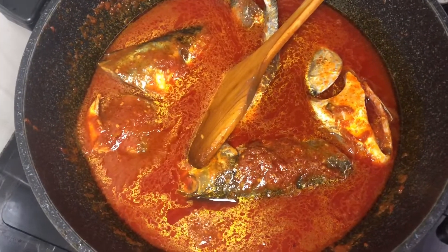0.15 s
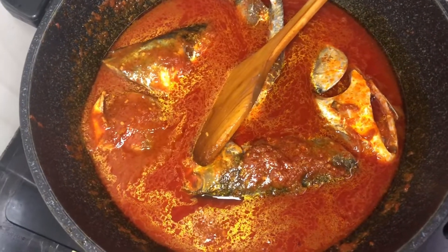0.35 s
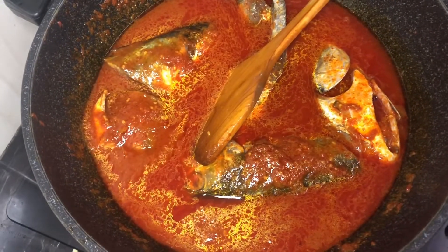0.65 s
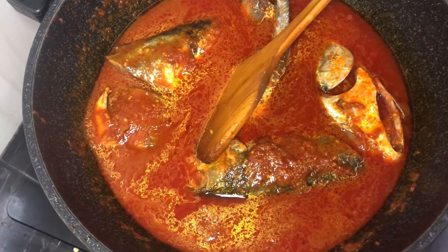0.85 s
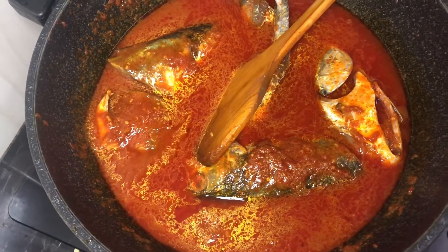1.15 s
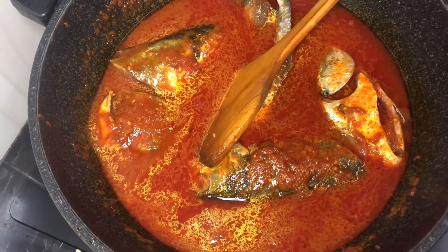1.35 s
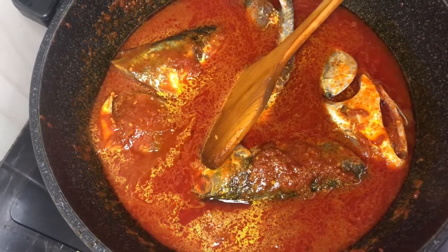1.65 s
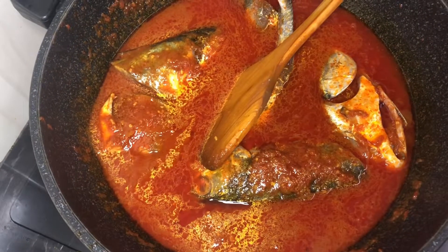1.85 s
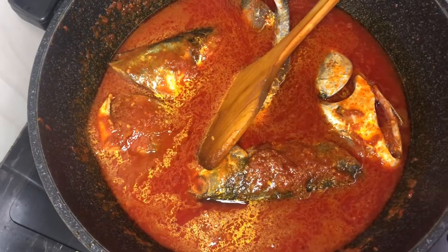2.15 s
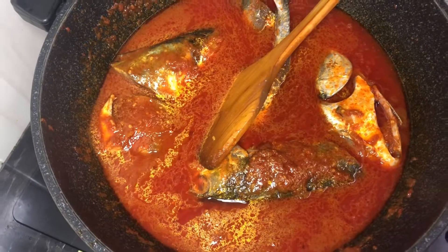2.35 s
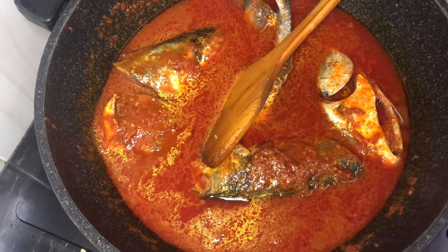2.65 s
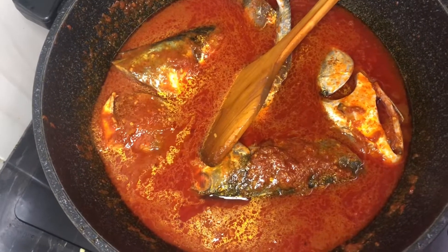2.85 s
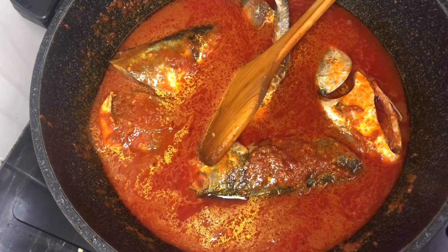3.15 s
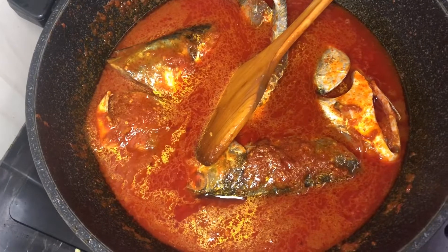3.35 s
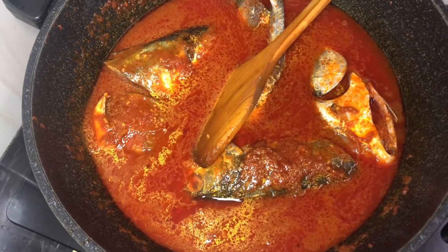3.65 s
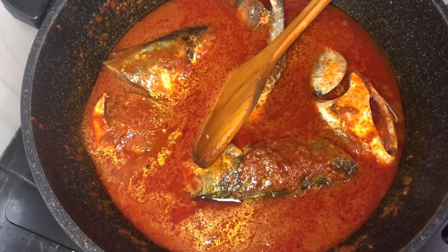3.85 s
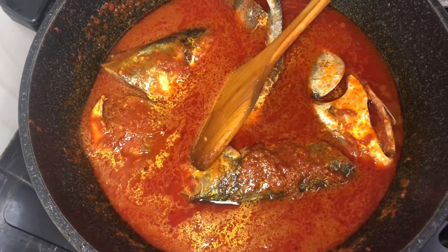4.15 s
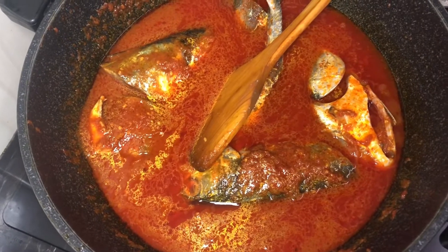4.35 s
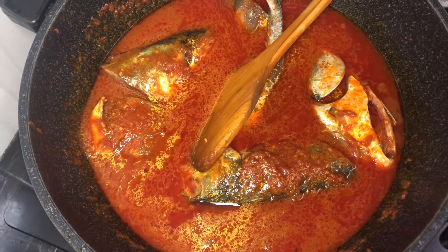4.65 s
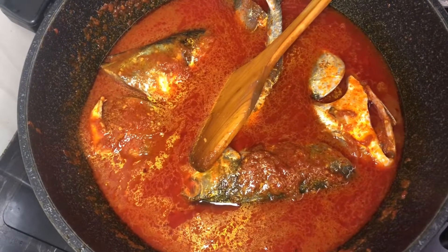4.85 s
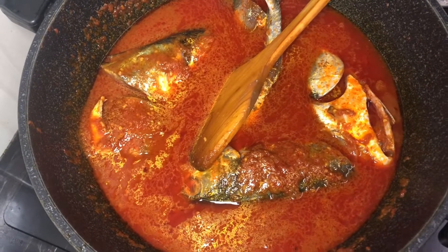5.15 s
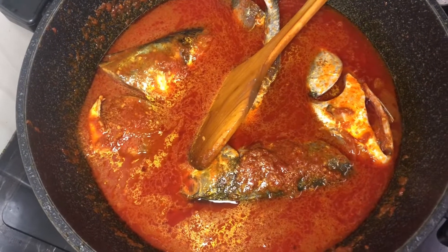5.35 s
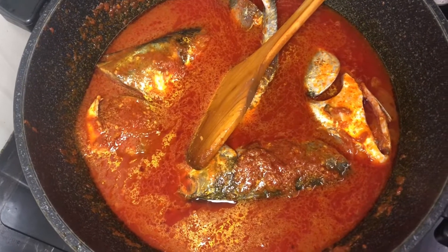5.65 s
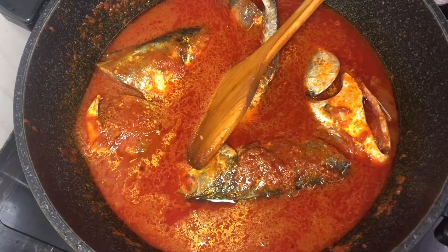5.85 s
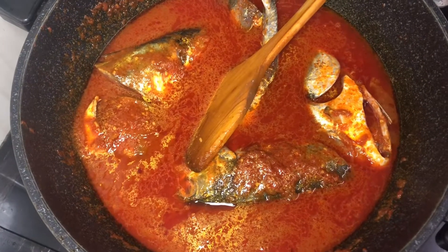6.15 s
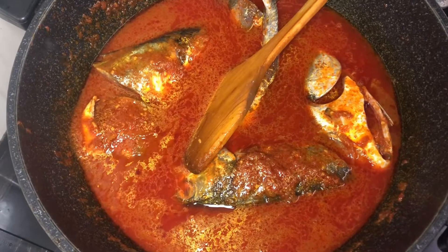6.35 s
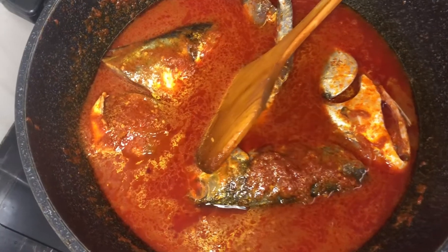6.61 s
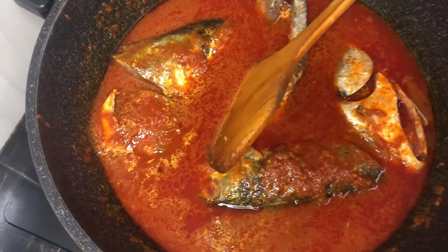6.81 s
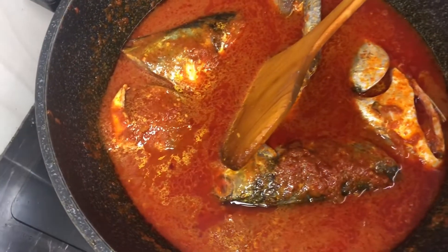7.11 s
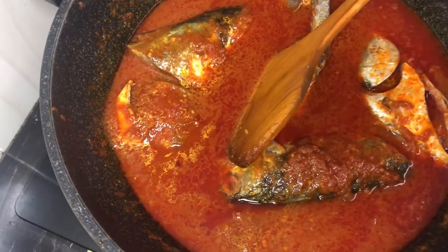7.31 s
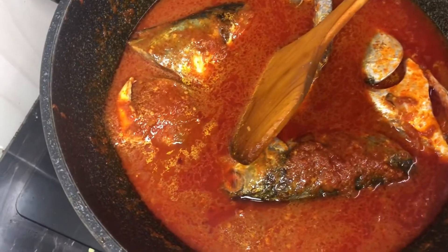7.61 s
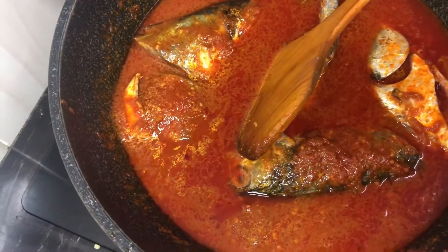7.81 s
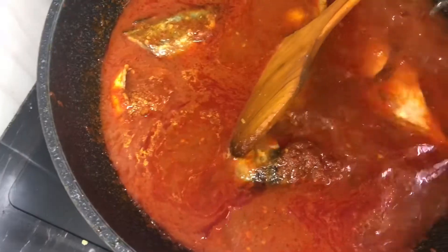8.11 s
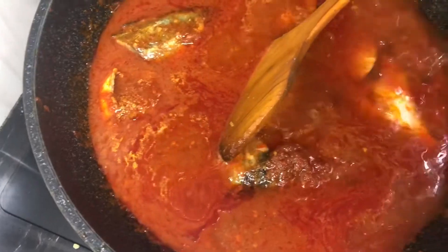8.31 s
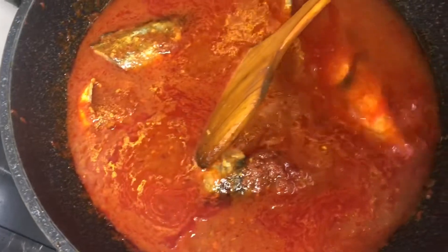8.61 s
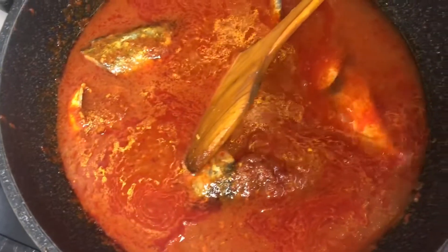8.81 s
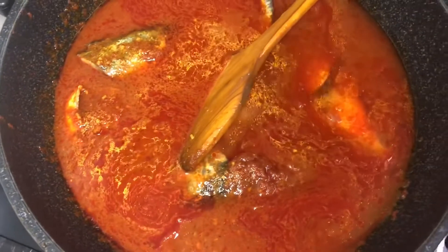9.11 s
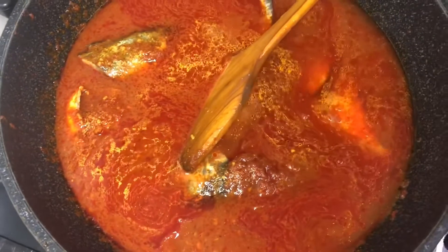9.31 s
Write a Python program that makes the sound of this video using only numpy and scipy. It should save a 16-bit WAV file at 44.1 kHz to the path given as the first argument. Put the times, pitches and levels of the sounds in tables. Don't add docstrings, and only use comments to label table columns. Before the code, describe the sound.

In a small kitchen with a low appliance hum, a tap opens onto steel, a metal lid clatters, a basin rattles and a jug is knocked and scraped. The splashing, fizzing jet makes the jug sing until it stops. Drops and taps follow, then a loud knock, a dip to silence, a gentle pour into sauce and a spatula knock. Close microphone, short echo.

```python
import sys
import numpy as np
from scipy import signal
from scipy.fft import rfft, irfft
from scipy.io import wavfile
from scipy.ndimage import uniform_filter1d, map_coordinates

SR = 44100
rng = np.random.default_rng(int(sys.argv[2]) if len(sys.argv) > 2 else 0)


def unload_audio(sound):
    columns = np.transpose(np.atleast_2d(sound))
    steps = np.round(np.clip(columns, -1, 1) * 32767)
    wavfile.write(sys.argv[1], SR, steps.astype(np.int16))


def linear_from_db(decibels):
    return 10 ** (np.asarray(decibels, float) / 20)


N = 417627

# frequency in Hz, density in dB per Hz.
ROOM_TONE = [(22, -54), (40, -26), (60, -30), (80, -5.5), (110, -3), (160, -7.5), (200, -8), (320, -17),
             (700, -17), (1800, -22.5), (4000, -30.5), (8000, -38), (11000, -40), (16000, -35)]
# time in seconds, gain in dB.
SIMMER = [(0, -1), (5.5, 1.5)]
# frequency in Hz, width in Hz, level in dB.
CABINET = [(195.2, 7.9, -56.5), (472.4, 5.5, -65.5), (714.4, 60, -59.5)]
# frequency in Hz, width in Hz.
MOTOR_HZ = [(100.1, .1), (93.5, .8), (120.3, .8), (232, .8)]
MOTOR_DB = [-41.5, -48.5, -48.5, -58.5]
# time in seconds, gain in dB.
JOLT = [
    (0.95, -1),
    (1.34, 15),
    (1.87, 13),
    (2.08, -0.5),
]

# time in seconds, level in dB.
TAP_ON_STEEL = [
    (0.49, -72),
    (0.515, -55),
    (0.688, -55),
    (0.888, -47.5),
]
# time in seconds, level in dB.
TAP_IN_JUG = [(1.17, -53), (1.95, -52.5), (2.4, -49), (2.9, -50), (3.3, -52.5), (3.69, -48.5), (3.88, -51),
              (4.19, -50), (4.65, -51.5), (5.19, -50.5), (5.82, -50.5), (5.87, -56.5), (6.0, -72)]
# time in seconds, level in dB.
SPURT = [
    (5.9, -64),
    (7.04, -70),
    (7.095, -51),
    (7.17, -51),
    (7.26, -59),
    (7.42, -61),
    (7.65, -60),
    (7.79, -54.5),
    (8.03, -61.5),
]
# time in seconds, level in dB.
POUR = [
    (8.045, -60),
    (8.16, -61.5),
    (8.35, -59),
    (8.95, -56),
    (9.284, -60.5),
    (9.47, -61.5),
]
# level in dB at full force, dB gained per dB of force.
ON_STEEL = [(-7, 0.7), (0.7, 1.2), (3, 0.8)]
# level in dB at full force, dB gained per dB of force.
IN_JUG = [(0.57, 0.76), (0.8, 1.33), (-1.9, 1.16)]
# level in dB at full force, dB gained per dB of force.
IN_BASIN = [(-6, 0.76), (0, 0.97), (0, 2.1)]
# level in dB at full force, dB gained per dB of force.
IN_SAUCE = [(9, 1.64), (-2.5, 0.56), (-9, 0.44)]
# frequency in Hz, width in Hz, level in dB.
FILLING = [(1150, 43, -9), (1400, 24, -4), (1786, 60, -6.5), (2160, 43, -4.5), (2530, 36, -9),
           (2883, 49, -6), (3300, 90, -8), (4760, 47, -13), (6850, 76, -19)]
# time in seconds, level in dB.
SINGING = [
    (2.6, -15),
    (2.85, 15),
    (3.9, -2),
    (4.5, 4),
    (5.6, 5),
    (5.9, -18),
]

# time in seconds, peak in dB, centre in Hz.
DRIPS = [(0.7094, -33, 14800), (0.764, -33, 6730), (0.8594, -31, 11000), (0.9438, -30, 14300),
         (6.774, -41.5, 4930), (7.2644, -30.5, 7000), (7.2978, -32, 6700), (7.434, -39, 13300),
         (7.4722, -26, 8060), (7.5368, -32, 13900), (7.5544, -30, 11900), (7.5867, -29, 15600),
         (7.6074, -25, 6300), (7.7193, -38, 5300), (7.7445, -27, 12700), (7.7887, -33, 11900),
         (7.8521, -38, 5380), (6.178, -45.5, 9000), (6.368, -49, 8000), (6.472, -46, 13000)]
# time in seconds, peak in dB, centre in Hz.
PLOPS = [(.712, -35, 990), (1.075, -34, 1174), (3.323, -34.5, 1060), (7.428, -38, 1050), (7.436, -42, 3700),
         (7.472, -34, 2000), (7.479, -35, 2900), (7.484, -36, 4000), (7.556, -32, 2050),
         (7.592, -36.5, 1900), (7.618, -38, 3500), (7.627, -39, 2700), (7.678, -37.5, 1120),
         (7.7186, -27.5, 3650), (7.729, -33, 3800), (7.747, -39, 2000), (7.7745, -38, 1170),
         (7.841, -34, 2100), (7.846, -35, 1700), (7.852, -39, 3600)]
# time in seconds, peak in dB, centre in Hz.
FLARES = [(3.1293, -33, 1750), (3.2425, -35, 2300), (3.3388, -37, 2160), (3.4251, -36, 2820),
          (3.5927, -33, 3480), (3.7538, -33, 1750), (4.2238, -36, 3160), (4.4074, -35.5, 1730),
          (4.5421, -34, 1790), (4.6314, -34, 1780), (4.8224, -32, 2810), (4.9448, -31, 2930),
          (5.0329, -36, 2260), (5.1681, -33, 2090), (5.2544, -33.5, 3340), (5.3871, -35.5, 3860),
          (5.5094, -36, 1740), (5.8062, -36, 1820)]
# time in seconds, peak in dB, centre in Hz.
SPATTER = [(8.107, -37, 15200), (8.1314, -33, 9620), (8.1489, -38, 15200), (8.1884, -39, 14000),
           (8.184, -41, 9300), (8.195, -33, 15300), (8.1185, -33, 13200), (8.109, -37, 10000),
           (8.2252, -33, 15400), (8.2427, -42, 13800), (8.2566, -34, 9140), (8.2741, -41, 11600),
           (8.3086, -32, 11900), (8.328, -43, 9270), (8.336, -29, 13000), (8.3606, -34, 13200),
           (8.3794, -47, 5480), (8.4494, -47, 5050), (8.569, -42, 9790), (8.8852, -39, 14900),
           (8.9006, -44, 7570), (9.3462, -45, 6150)]

# frequency in Hz, width in Hz, level in dB.
LID = [(715, 97, 6.5), (842, 40, 8), (1020, 21, -13), (1100, 5.7, 5), (1515, 37, 8), (1815, 42, 9),
       (2090, 40, 2), (2310, 46, 4), (2920, 170, 6.5), (3350, 30, -16), (3830, 30, -33)]
# frequency in Hz, width in Hz, level in dB.
BASIN = [(616, 22, -6), (713, 24, 5), (790, 71, 0), (935, 57, -6.5), (918, 50, 5.5), (1130, 14, 5),
         (1285, 18, -4), (1490, 66, -1.5), (2100, 49, 1.5), (2320, 54, 0), (2550, 80, 2), (2970, 55, -2),
         (3290, 50, -13), (3570, 27, -5), (4670, 60, -5), (6210, 46, 5), (6700, 60, -20)]
# frequency in Hz, width in Hz, level in dB.
JUG = [(1780, 20, -14), (2095, 46, -6), (2810, 60, -2.5), (3275, 26, 4), (3940, 40, -5), (4860, 27, 0.5),
       (5870, 40, -6), (7000, 40, -0.5), (6700, 36, -2), (9860, 50, -4)]
# frequency in Hz, width in Hz, level in dB.
RIM = [(71, 8.5, -17), (165, 11, -9), (287, 31, -4.5), (408, 36, 3), (490, 69, -8), (740, 64, 3),
       (1330, 87, 4), (2100, 210, 2), (2380, 160, -6), (3700, 250, -19)]
# time in seconds, peak in dB, hardness (edge over body) in dB, rattle t60 in seconds.
LID_HITS = [
    (1.186, -16.5, 4, 0.28),
    (1.208, -24, 2, .15),
    (1.244, -21.5, 8, 0.23),
    (1.291, -22.5, -4, 0.22),
    (1.333, -26.5, -9, 0.22),
    (1.379, -29.5, -13, .2),
    (1.415, -31.5, -9, 0.17),
    (1.443, -26, 5, 0.15),
]
# time in seconds, peak in dB, hardness in dB, rattle t60 in seconds.
BASIN_HITS = [(1.514, -28, 4, 0.12), (1.533, -22.5, 1, 0.2), (1.545, -21, -14, .22),
              (1.574, -25.5, 4, 0.13), (1.6, -27, -10, 0.33), (1.622, -27, -14, .15),
              (1.633, -18.5, 6, 0.15), (1.668, -24, -1, 0.17), (1.718, -23, 14, 0.14),
              (1.735, -19, -8.5, 0.21), (1.762, -24.5, -13, 0.28)]
# time in seconds, peak in dB, hardness in dB, rattle t60 in seconds.
WET_BASIN_HITS = [
    (1.797, -27, 4, 0.17),
    (1.85, -38, 20, .5),
    (2.463, -29, 6, 0.35),
    (2.514, -30, 6, 0.35),
    (2.685, -27, 12, 0.25),
    (2.739, -30, 16, 0.49),
    (3.324, -35, -7, 0.18),
]
# time in seconds, peak in dB, hardness in dB, rattle t60 in seconds.
JUG_HITS = [
    (2.012, -17.5, 3.8, 0.15),
    (2.686, -26.5, 1.5, 0.6),
    (2.933, -24.5, 3, 0.32),
    (2.969, -30.5, 26, 0.22),
]
# time in seconds, peak in dB, hardness in dB, rattle t60 in seconds.
RIM_HITS = [
    (7.472, -32, 8, 0.24),
    (7.526, -31, 3, 0.06),
    (7.538, -31, 2, 0.12),
    (7.555, -30, 8, 0.14),
    (7.59, -34, 8, 0.12),
    (7.816, -18, 9, 0.035),
    (7.842, -39, 8, 0.06),
    (9.228, -18.5, 24, 0.082),
    (9.288, -29, 26, 0.086),
]
# frequency in Hz, width in Hz, level in dB.
COUNTER = [(119.6, 14.4, -3), (155.3, 9, -9), (194.2, 9.8, -1.5), (228.7, 11.7, 0), (283, 16, -5.5),
           (380, 30, -10.5), (458, 9, -7)]
# time in seconds, peak in dB.
COUNTER_THUDS = [
    (1.245, -12.5),
    (1.29, -23),
    (1.325, -19),
    (1.385, -21),
    (1.52, -28.5),
    (1.6, -28.5),
    (1.75, -32),
    (2.1, -40),
    (5.66, -39),
]
# time in seconds, peak in dB.
PAN_THUDS = [
    (9.233, -19),
    (9.291, -25.5),
]

# time in seconds, peak in dB, frequency in Hz, t60 in seconds.
PINGS = [(1.8274, -34, 3290, 0.085), (1.94, -37, 2700, 0.17), (2.0115, -19.5, 4680, 0.074),
         (3.5794, -43, 3440, 0.15), (4.5494, -43, 2190, 0.14), (4.9452, -41, 2910, 0.098),
         (1.188, -26, 1500, .13), (1.19, -26.5, 861, .25), (1.188, -27, 2400, .09), (1.188, -27, 2850, .07),
         (1.445, -31, 2200, 0.084), (1.292, -29, 804, .1), (2.463, -28.5, 1130, .11),
         (2.463, -32, 2100, 0.077), (2.463, -35.5, 2900, .1), (2.514, -32, 2500, .09),
         (2.686, -29.5, 2540, .15), (2.686, -35, 1900, 0.092), (2.686, -33, 1490, .1),
         (2.932, -31, 2780, .08), (2.932, -31, 3250, .1), (1.797, -28, 628, .12), (7.817, -25, 2730, .05),
         (7.817, -27, 3500, 0.047)]
# time in seconds, peak in dB, frequency in Hz, t60 in seconds.
SWELLS = [(1.482, -32, 1130, .2), (1.545, -18.5, 2490, .1), (1.537, -20.5, 945, .11),
          (1.535, -27, 760, .14), (1.62, -28, 910, .25), (1.634, -27, 2570, .13), (1.662, -26, 2700, .08),
          (1.718, -25, 2320, .2), (1.729, -21, 905, .1), (1.76, -27, 1000, .1), (1.74, -29, 615, .3),
          (1.245, -30, 1830, .1), (1.31, -33, 1830, .1), (1.86, -39, 2230, .3), (2.512, -33, 670, .12),
          (2.5, -36, 2200, 0.22), (2.7, -32, 740, .16), (2.695, -37, 3280, .12), (2.745, -37, 3220, .3),
          (7.551, -27, 2850, .085), (7.53, -33, 1050, .2), (2.525, -33, 615, .35), (2.635, -33, 622, .3),
          (2.72, -32, 615, .3), (2.8, -35, 610, .2), (2.56, -38, 1150, 0.22), (2.75, -36, 1370, .15)]
# time in seconds, peak in dB, frequency in Hz, t60 in
# seconds.
BUBBLES = [
    (7.463, -24.5, 1220, 0.037),
    (7.539, -23, 1330, 0.044),
    (7.526, -28, 1090, 0.055),
    (2.935, -30, 6850, .12),
]
# time in seconds, peak in dB, frequency in Hz, t60 in seconds.
HUMS = [
    (2.934, -42, 4860, 0.31),
    (7.54, -34, 490, 0.14),
    (7.82, -28, 644, 0.06),
]
# time in seconds, level in dB.
DRAG = [
    (2.035, -30),
    (2.043, -36),
    (2.052, -15.5),
    (2.122, -18),
    (2.16, -28.5),
    (2.3, -39),
]
# frequency in Hz, width in Hz, level in dB.
SCRAPE = [(1860, 41, 0), (3316, 73, 3.5), (3800, 11, -5), (4860, 56, 1.5), (5820, 44, -2), (6730, 88, 7),
          (7800, 170, -7), (8900, 150, -6), (9750, 35, -2), (11900, 67, -15), (12900, 55, -8),
          (14000, 110, -1)]
# time in seconds, frequency in Hz, level in dB.
WHISTLE = [
    (2.84, 1790, -55),
    (2.86, 1695, -48),
    (2.93, 1784, -43.5),
    (3.36, 1778, -58),
    (3.57, 1739, -51),
    (3.84, 1758, -46),
    (3.88, 1770, -60),
    (5.47, 1786, -55),
    (5.7, 1742, -62),
]
# frequency in Hz, t60 in seconds.
ECHO = [(200, 0.88), (1000, 0.28), (4000, 0.19), (12000, 0.22)]


def evened(x):
    return x / np.sqrt(np.mean(x ** 2) + 1e-20)


def read(points, hz):
    f, value = np.transpose(points)
    return np.interp(np.log(hz + 1), np.log(f + 1), value)


def add(mix, start_s, sound):
    part = mix[round(start_s * SR):][:len(sound)]
    part += sound[:len(part)]


def resonate(x, hz, width_hz):
    turn = np.exp(2j * np.pi * np.cumsum(hz * np.ones(len(x))) / SR)
    r = np.exp(-np.pi * width_hz / SR)
    return 2 * (turn * signal.lfilter([1 - r], [1, -r], x / turn + 1e-18)).real


def colour(x, points):
    return irfft(rfft(x) * linear_from_db(read(points, np.fft.rfftfreq(len(x), 1 / SR))), len(x))


def hiss(field_db, patchy_db, flicker_db, size):
    a, b, patches = rng.standard_normal((field_db.shape[1], field_db.shape[0], 3)).T
    patches = uniform_filter1d(patches, size=3, axis=0)
    patches = evened(uniform_filter1d(patches, size=12288 // size, axis=1))
    flicker = evened(uniform_filter1d(patches[0] + a[0], size=3))
    depth_db = patchy_db * np.linspace(1, .55, len(a))[:, None]
    z = (a + 1j * b) * linear_from_db(field_db + depth_db * patches + flicker_db * flicker)
    return signal.istft(z, nperseg=size, noverlap=3 * size // 4)[1][:N]


def room_tone():
    room_db, shaft_hz, shake_db, shake_wander_db = -46, 48.5, -65, 3.5
    hz = np.fft.rfftfreq(2048, 1 / SR)
    frame_s = np.arange(N // 512 + 5) * 512 / SR
    field_db = read(ROOM_TONE, hz)[:, None] * np.ones(len(frame_s))
    finest = np.clip(hz / 5000 - 1.6, 0, 1)[:, None]
    field_db = field_db + finest * np.interp(frame_s, *np.transpose(SIMMER))
    power = linear_from_db(2 * field_db[:, 0])
    share = np.sum(power[hz > 300]) / np.sum(power)
    wash = linear_from_db(room_db) * evened(hiss(field_db, 2.62, 0.52, size=2048)) / np.sqrt(share)

    noise, t = rng.standard_normal(N), np.arange(N) / SR
    hum = sum(linear_from_db(db) * evened(resonate(resonate(noise, f, w), f, w)) for f, w, db in CABINET)
    for (f, w), db in zip(MOTOR_HZ, MOTOR_DB):
        wander = evened(uniform_filter1d(rng.standard_normal(N), size=SR // 2))
        hum += linear_from_db(db) * np.sqrt(2) * np.sin(2 * np.pi * np.cumsum(f + w / 2 * wander) / SR)

    sway = evened(uniform_filter1d(uniform_filter1d(noise, size=SR // 3), size=SR // 3))
    level_db = shake_db + shake_wander_db * sway + np.interp(t, *np.transpose(JOLT))
    return wash + hum + linear_from_db(level_db) * np.sqrt(2) * np.sin(2 * np.pi * shaft_hz * t)


def layers(force, surface):
    s, db = np.transpose(force)
    return np.transpose([s] + [db.max() + full_db + follow * (db - db.max()) for full_db, follow in surface])


def water(rows, sing_db, patchy_db, grain_db):
    s, splash, spray, fizz = np.transpose(rows)
    hz, t = np.fft.rfftfreq(512, 1 / SR), np.arange(N // 128 + 5) * 128 / SR
    density_db = [splash - 14, splash - 5, splash, spray - 2.2, fizz - 3.7, fizz - 3.7]
    levels_db = np.array([np.interp(t, s, d, -130, -130) for d in density_db])
    band_hz = [400, 1000, 2600, 6300, 12000, 16000]
    place = np.interp(np.log(hz + 1), np.log(band_hz), np.arange(6))
    field_db = map_coordinates(levels_db, np.meshgrid(place, np.arange(len(t)), indexing="ij"), order=1)
    flow = hiss(field_db, patchy_db, 0.8, size=512) * linear_from_db(-9.5)

    drops = linear_from_db(grain_db * np.minimum(rng.exponential(1, N), 4))
    drops *= rng.random(N) < 60 / SR
    flow = flow * (1 + 0.16 * signal.oaconvolve(drops, np.exp(-np.arange(800) / 160))[:N])

    swings = evened(uniform_filter1d(rng.standard_normal((len(t), len(FILLING))), size=40, axis=0)).T
    sung = np.zeros(N)
    for (f, w, db), swing in zip(FILLING, swings):
        sung += linear_from_db(db + 1.6 * np.repeat(swing, 128)[:N]) * resonate(flow, f, w)
    return flow + linear_from_db(sing_db) * sung


def tick(s, peak_db, hz, t60, breadth_oct, top_db):
    t = np.arange(4410) / SR
    near, far = 2 ** breadth_oct, 2 ** (3 * breadth_oct)
    shape = [(hz / far, -40), (hz / near, -12), (hz, 0), (hz * near, -12), (hz * far, top_db)]
    burst = linear_from_db(-60 * t / t60) + 0.7 * np.exp(-t / 0.00099)
    return s, linear_from_db(peak_db - 4.5) * burst * evened(colour(rng.standard_normal(len(t)), shape))


def ringing(drive, modes, spread_db):
    luck = rng.standard_normal((len(modes), 2))
    ring = np.zeros(len(drive))
    for (f, w, db), (a, b) in zip(modes, luck):
        ring += linear_from_db(db + spread_db * a) * resonate(drive, f * (1 + .018 * b), w) / np.sqrt(w)
    return ring


def blow(row, modes, top_db, top_per_db, ring_db, crack, rise_s):
    s, peak_db, mid_db, t60 = row
    high_db = top_db + top_per_db * mid_db
    t = np.arange(22050) / SR
    noise = rng.standard_normal(len(t))
    body = colour(noise, [(350, -32), (580, 0), (1300, 0), (2000, -15), (7000, -22)])
    edge = colour(noise, [(1000, mid_db - 18), (1700, mid_db - 5.5), (3500, mid_db - 5),
                          (7000, high_db - 7), (16000, high_db - 15)])
    rattle = body * linear_from_db(-60 * t / t60) * np.minimum(t / (3.9 * rise_s), 1)
    rattle += edge * linear_from_db(-60 * t / (0.77 * t60))
    rattle *= (1 + crack * np.exp(-t / 0.004)) * np.minimum(t / rise_s, 1)
    rattle = rattle[:round(t60 * SR) + 3000]
    ring = ringing(rattle, modes, 2.5)
    sound = rattle + linear_from_db(ring_db) * ring * np.std(rattle) / np.std(ring)
    return s, linear_from_db(peak_db - 5) * sound / np.sqrt(uniform_filter1d(sound ** 2, size=180).max())


def thud(row, rise_s, modes):
    s, peak_db = row
    t = np.arange(26000) / SR
    sound = np.zeros(len(t))
    for (f, w, db), pull in zip(modes, rng.uniform(.98, 1.02, len(modes))):
        sound += linear_from_db(db) * np.exp(-np.pi * w * t) * np.sin(2 * np.pi * f * pull * t)
    sound *= 1 - np.exp(-t / rise_s)
    return s, linear_from_db(peak_db) * sound / np.abs(sound).max()


def bubble(row, attack_s):
    s, peak_db, hz, t60 = row
    rise_oct_per_s = (0.058 / t60) ** 2
    t = np.arange(round(t60 * SR)) / SR
    uneven = 1 + 0.45 * evened(uniform_filter1d(rng.standard_normal(SR), size=120))[:len(t)]
    tone = np.sin(2 * np.pi * np.cumsum(hz * 2 ** (rise_oct_per_s * t)) / SR)
    return s, linear_from_db(peak_db - 60 * t / t60) * np.minimum(t / attack_s, 1) ** 1.3 * uneven * tone


def drag():
    s, level_db = np.transpose(DRAG)
    t = np.arange(s[0], s[-1], 1 / SR)
    rub = colour(rng.standard_normal(len(t)), [(1000, -33), (3000, 10), (16000, 2.5)])
    wall = sum(linear_from_db(db) * evened(resonate(rub, f, w)) for f, w, db in SCRAPE)
    scrape = evened(evened(wall) + linear_from_db(-1) * evened(rub))
    return s[0], linear_from_db(np.interp(t, s, level_db) - 7) * scrape


def whistle():
    s, hz, level_db = np.transpose(WHISTLE)
    t = np.arange(s[0], s[-1], 1 / SR)
    wobble = evened(uniform_filter1d(rng.standard_normal((len(t), 2)), size=900, axis=0)).T
    tone = np.sin(2 * np.pi * np.cumsum(np.interp(t, s, hz) + 11 * wobble[0]) / SR)
    ends = np.clip(np.minimum(t - s[0], s[-1] - t) / .04, 0, 1)
    return s[0], ends * linear_from_db(np.interp(t, s, level_db) + 3.5 + 1.6 * wobble[1]) * tone


def kitchen(x):
    taps = np.zeros(SR // 2)
    at = np.arange(200, len(taps) - 20, 20)
    taps[at + rng.integers(0, 20, len(at))] = rng.choice([-1., 1.], len(at))
    hz, t, z = signal.stft(taps, SR, nperseg=256)
    decay = linear_from_db(-60 * t / read(ECHO, hz)[:, None])
    tail = signal.istft(z * decay, SR, nperseg=256)[1]
    return signal.fftconvolve(x, tail / np.linalg.norm(tail))[:N]


def scene():
    near, felt = np.zeros((2, N))
    sing_db = np.interp(np.arange(N) / SR, *np.transpose(SINGING))
    tap = np.vstack([layers(TAP_ON_STEEL, ON_STEEL), layers(TAP_IN_JUG, IN_JUG)])
    wet = water(tap, sing_db, patchy_db=2.44, grain_db=4.3)
    wet += water(layers(SPURT, IN_BASIN), -44, patchy_db=4.2, grain_db=2)
    wet += water(layers(POUR, IN_SAUCE), -15, patchy_db=1.6, grain_db=2.9)

    flares = np.add(FLARES, [0, -5, 0])
    bursts = ((DRIPS, 0.049, 0.47, -14), (PLOPS, 0.053, .16, -40),
              (flares, 0.1, 0.054, -36), (SPATTER, 0.02, .36, -12))
    for rows, *shape in bursts:
        for row in rows:
            add(near, *tick(*row, *shape))

    bodies = ((LID_HITS, LID, -1.5, 1, -1.5, .3, .0011),
              (BASIN_HITS, BASIN, -1.5, 0.67, -1.5, .1, .004),
              (WET_BASIN_HITS, BASIN, -12, 0.87, -1.5, .6, .0011),
              (JUG_HITS, JUG, 7.6, .2, 1.2, .2, .0011),
              (RIM_HITS, RIM[4:], 2.8, .05, -9, 1.6, .0012))
    for rows, *body in bodies:
        for row in rows:
            add(near, *blow(row, *body))
    for rows, rise_s, modes in (COUNTER_THUDS, 0.0047, COUNTER), (PAN_THUDS, 0.0021, RIM[:4]):
        for row in rows:
            add(felt, *thud(row, rise_s, modes))
    for rows, attack_s in (PINGS, .0015), (SWELLS, .0099), (BUBBLES, .0015), (HUMS, .0015):
        for row in rows:
            add(felt, *bubble(row, attack_s))
    add(near, *drag())
    add(felt, *whistle())

    echoes = linear_from_db(-8.5) * kitchen(near + linear_from_db(-4.5) * felt)
    return np.tile(near + felt + echoes + wet + room_tone(), (2, 1))


def top_cut(x):
    return signal.sosfilt(signal.butter(12, 16820, fs=SR, output="sos"), x)


def record(dry):
    change_s, gap_s, fade_s = 8.03, .012, 0.15
    away_s = np.arange(N) / SR - change_s
    before = linear_from_db(-2) * np.clip(-away_s / fade_s, 0, 1) ** 0.96
    after = linear_from_db(-2.5) * np.clip((away_s - gap_s) / fade_s, 0, 1) ** 1.5
    fade = np.where(away_s < 0, before, after)
    edge = signal.firwin(511, 15850, window=("kaiser", 9), fs=SR)
    return top_cut(signal.oaconvolve(dry * fade, edge[None], "same"))


dry = scene()
out = record(dry)
unload_audio(out)
```